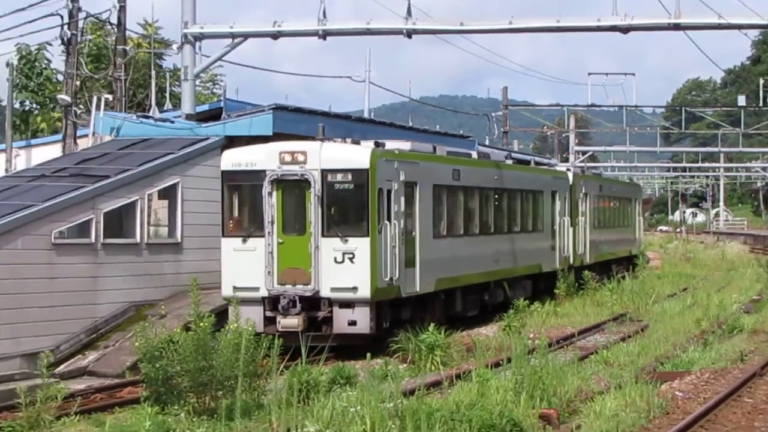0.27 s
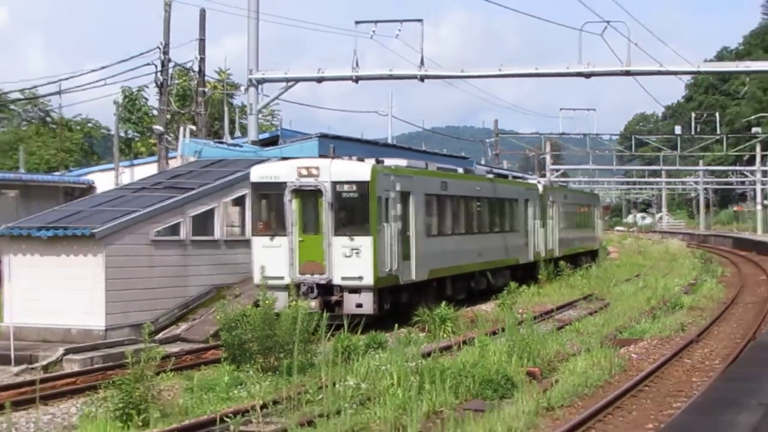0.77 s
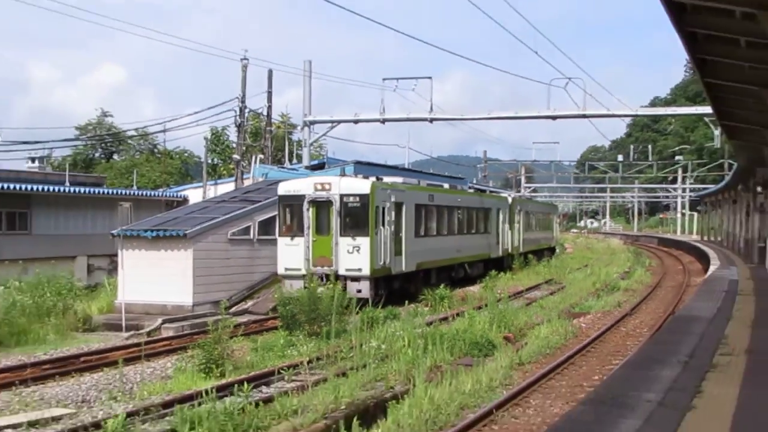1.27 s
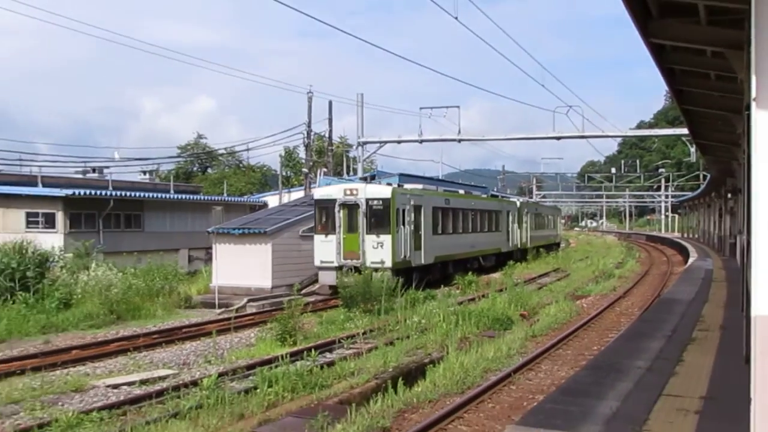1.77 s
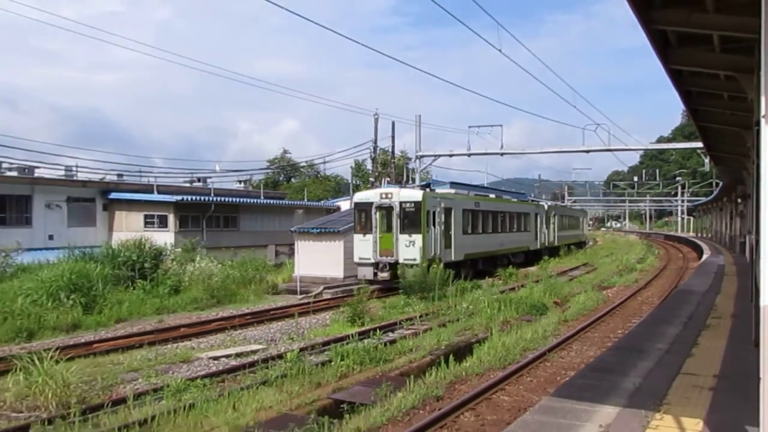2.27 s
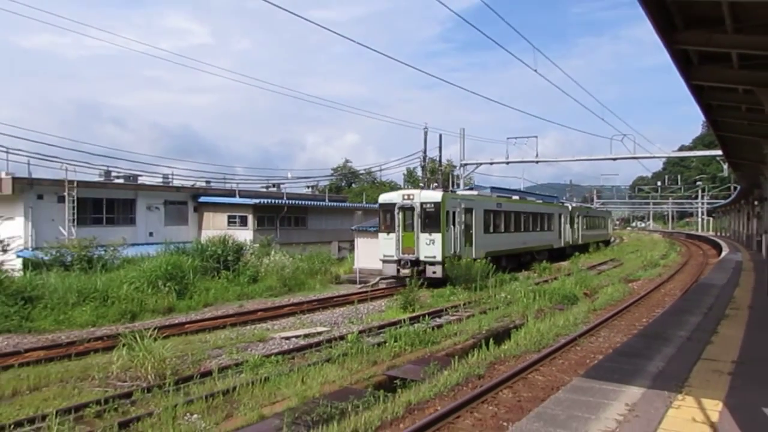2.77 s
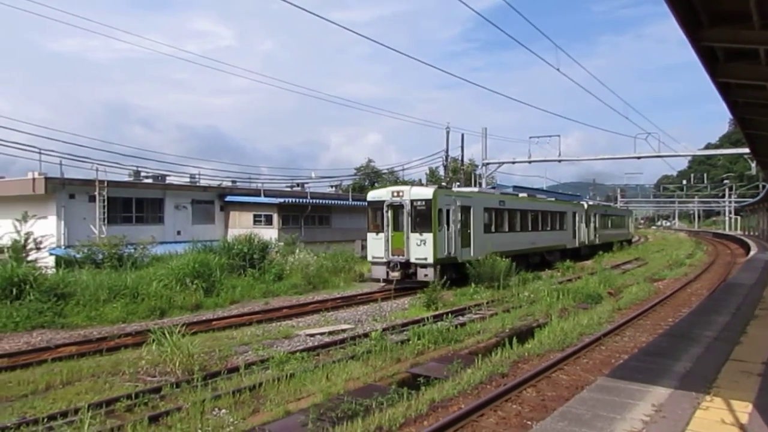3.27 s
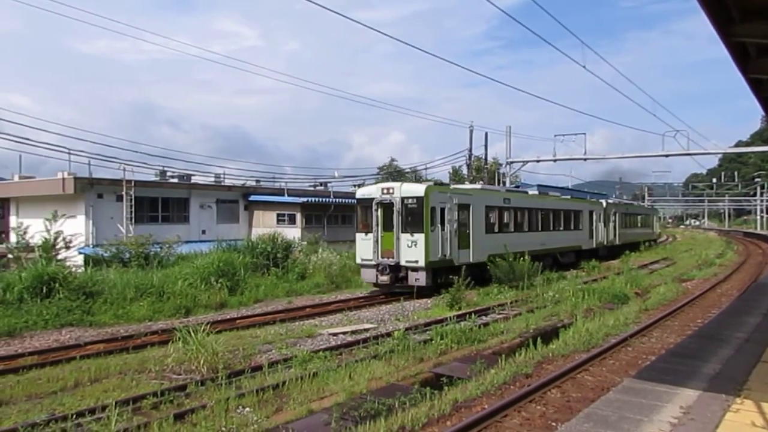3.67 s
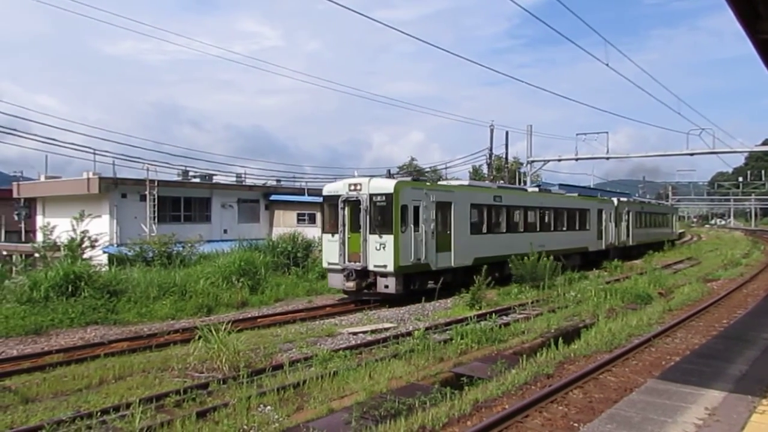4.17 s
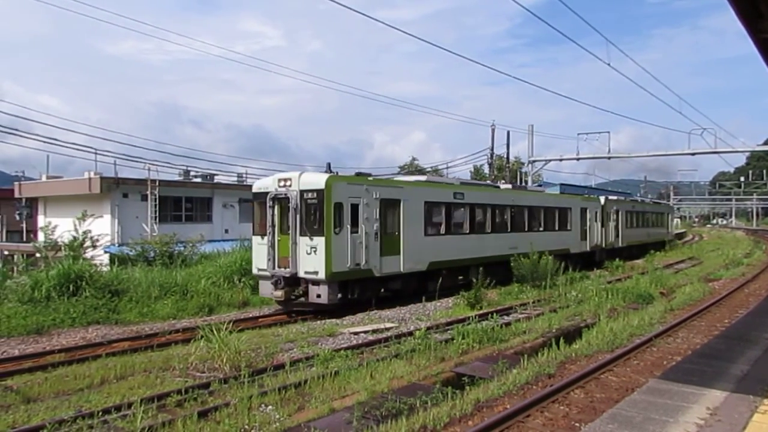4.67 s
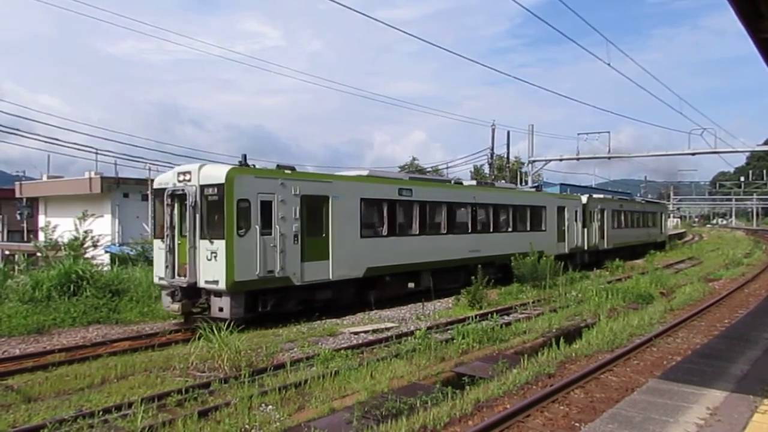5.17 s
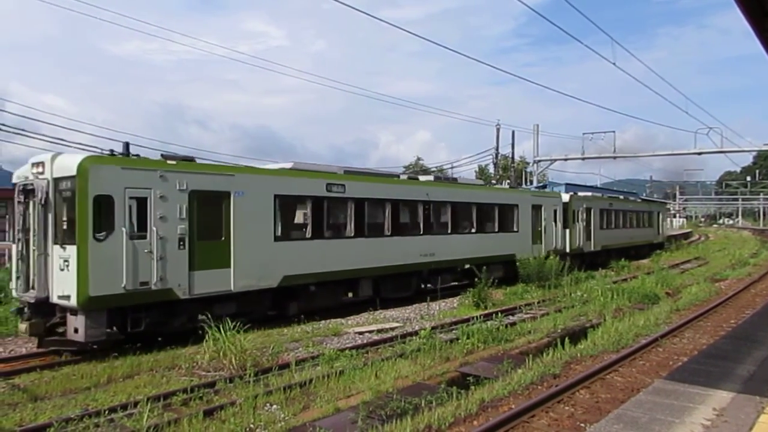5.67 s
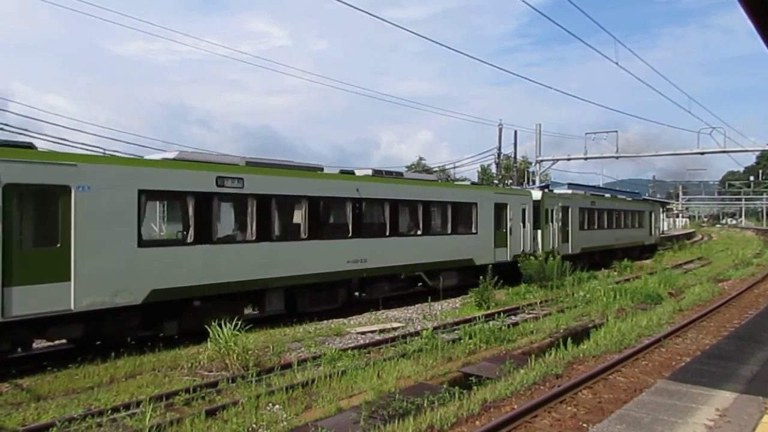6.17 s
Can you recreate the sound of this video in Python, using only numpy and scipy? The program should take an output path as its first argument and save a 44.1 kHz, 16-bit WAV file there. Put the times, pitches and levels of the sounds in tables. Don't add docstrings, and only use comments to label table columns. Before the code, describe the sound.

A diesel railcar pulls along a curved track in open air. At first its deep droning exhaust wavers under buffeting wind, with a soft treble hiss and a faint high squeal. Wheels knock over gaps and a joint with a brief twang and echoes. As it draws level, rolling noise swells, steel scrapes in rough spells, short ringing chirps appear, and a very thin top squeal persists while the drone recedes underneath.

```python
import sys
import numpy as np
from scipy import signal
from scipy.fft import rfft, irfft
from scipy.io import wavfile
from scipy.ndimage import uniform_filter1d, map_coordinates

SR = 44100
rng = np.random.default_rng(int(sys.argv[2]) if len(sys.argv) > 2 else 0)


def output_pcm(signal):
    pcm = np.clip(np.atleast_2d(signal).T, -1, 1) * 32767
    wavfile.write(sys.argv[1], SR, np.round(pcm).astype(np.int16))


def decibels_to_gain(level_db):
    exponent = np.asarray(level_db, float) / 20
    return 10 ** exponent


N = 283563
TIME = np.arange(N) / SR

# t/s, distance/m
DISTANCE = [(0, 31.5), (1.3, 26.1), (1.9, 24), (2.35, 18.3), (3.1, 17.9), (3.84, 12.7), (4.3, 11.15),
            (5.1, 9.14), (6.43, 6.75)]
REFERENCE_M = 8
# t/s, load/dB
LOAD = [(0, 6.5), (.14, 4), (.3, -3), (.96, 2), (1.3, -3.5), (1.92, 5), (2.56, 6), (2.9, 6.5), (3.2, 9),
        (3.52, 5.5), (4.16, 8.5), (4.48, 7), (4.8, 2), (5.12, 4.5), (5.76, 0), (6.43, -0.5)]

# t/s, f/Hz, second harmonic level/dB
FIRING = [(0, 61.1, -35), (.3, 61.3, -35), (.42, 61.7, -29), (.58, 61.8, -40), (.78, 62, -33.5),
          (.97, 62.3, -27), (1.22, 62.86, -35), (1.65, 63.3, -27), (1.83, 63.6, -32.5), (2.02, 65.25, -22),
          (2.26, 67.15, -32), (2.7, 69.03, -21), (3.4, 69.9, -28), (3.75, 70.3, -25), (4.0, 71.6, -34),
          (4.5, 75.8, -36), (5.2, 79.3, -33.5), (6.43, 80.6, -34.5)]
# t/s, slip/turns, in-step level/dB, weaker share/0-1
BEAT = [(0, .1, -17, 0.1), (.22, 0.43, -17.5, 0.36), (.78, 1.48, -18.5, 0.3), (1.36, 2.54, -15, 0.46),
        (1.95, 3.53, -16, 0.8), (2.25, 3.77, -12.5, 1), (2.68, 3.85, -11, 0), (3.25, 4.23, -18, 0.01),
        (3.55, 4.5, -18.5, 0.57), (4.07, 4.95, -13.5, 0.3), (4.6, 5.03, -15, 0.61), (4.88, 5.4, -14, 0.2),
        (5.09, 5.5, -17.5, 0.45), (5.34, 6.0, -17, 0.7), (5.58, 6.46, -20, 0.16), (5.8, 7.3, -21.5, 0.09),
        (6.03, 6.9, -21, 0.3), (6.43, 9.1, -22, 0.6)]
# multiple of the firing rate/1, level at no load/dB, lead/rad
UPPER_ORDERS = [(3, -42, -2.5), (4, -53, -1.5), (5, -46, -1.6), (6, -45, -.3)]

# f/Hz, level/dB per Hz
ROAR_COLOUR = [(30, -13), (45, -23), (60, -12.5), (100, -7), (170, -11.5), (330, -15.5), (560, -19),
               (900, -24.5), (1500, -31.5), (1900, -37), (2300, -44), (2500, -71), (3000, -92)]
# f/Hz, width/Hz, level/dB
UNDERFRAME_MODES = [(428, 71, 6), (712, 17, 8), (1084, 50, 3), (241, 7.5, -12), (632, 17, 5),
                    (410, 16, -0.5), (550, 79, -1.5), (1462, 68, 3.5)]
# level at 8 m/dB, per nearness/dB/dB, per load/dB/dB, at flange bite/dB
ROAR_PARTS = [(-26.5, 0.6947, 0.79, 0), (-30, 0.81, 0.76, -1.5), (-31.5, 0.8855, 0.5461, 1.5),
              (-39.5, 1.23, 0.59, 0.5)]
# f/Hz, unrelated share level/dB
FAR_SIDE = [(60, -51), (110, -76), (200, -40), (380, -24), (700, -15), (1290, -19), (2380, -25),
            (4400, -19), (8120, -8.5), (15000, -4.5)]

# f at the start/Hz, level under the body/dB
AUX_LINES = [(410, -13), (604, -15), (671, -11), (744, -15)]
AUX_CREEP_PER_S, AUX_ENDS_S = 0.0095, 5.4
# start t/s, end t/s, f/Hz, width/Hz, level/dB
HUMS = [(0, 0.16, 412, 30, -35), (3.63, 3.73, 240, 30, -30), (4.15, 4.45, 700, 30, -30),
        (4.5, 4.7, 428, 19, -28.5), (3.5, 4.7, 231, 14.2, -32.5), (5.1, 5.3, 248, 16, -30),
        (5.57, 6.2, 878, 14, -38), (5.535, 5.56, 1122, 8, -25), (5.58, 6.25, 1135, 20, -35.5),
        (5.8, 6.05, 5200, 60, -46), (5.9, 6.45, 2610, 24, -44), (5.3, 5.43, 130, 14, -29),
        (3.85, 4.0, 300, 60, -31), (3.9, 4.1, 1090, 60, -35), (3.15, 3.2, 520, 40, -28),
        (.44, .46, 685, 25, -33), (.83, .9, 675, 18, -38), (1.02, 1.1, 680, 20, -39)]

# f/Hz, level/dB per Hz
HISS_COLOUR = [(1500, -22), (2300, -2.5), (2550, -4.5), (3200, -4), (3500, -3), (4400, 0), (5600, 1),
               (6700, 3.5), (8000, 1), (11000, -4), (14000, -12), (15300, -15), (16000, -25)]
# f/Hz, width/Hz, level/dB
HISS_MODES = [(6680, 110, 5), (2950, 110, -6), (5190, 40, 6), (4960, 120, 3), (3160, 130, 3),
              (4570, 150, 3), (9740, 90, 4), (12300, 200, 3), (13500, 160, 4), (13950, 100, 3),
              (7900, 500, -2)]
# level at 8 m/dB, per nearness/dB/dB, per load/dB/dB, at flange bite/dB
HISS_PARTS = [(-42, 1.57, 0.17, 4), (-48, 2.11, 0.11, 5.4), (-42, 1.79, 0.2, 3.9), (-44.5, 2.05, 0.57, 2.7)]

# t/s, level/dB, f/Hz
THUMPS = [(0.01, -15, 135), (0.036, -25, 149), (0.088, -20, 158), (0.112, -15, 159), (0.134, -6.5, 174),
          (0.2011, -5.5, 215), (0.229, -16.5, 163), (0.321, -33, 134), (0.368, -16, 162), (0.432, -24, 171),
          (0.83, -28, 114.2), (0.889, -8, 152), (0.94, -21, 200), (0.954, -7, 200), (1, -6.5, 190),
          (1.032, -19, 160), (1.085, -12.5, 182), (1.346, -22, 140), (2.14, -19.5, 150), (2.165, -22, 170),
          (2.189, -29, 134), (4.922, -19, 139), (5.031, -27, 166), (5.079, -19, 174), (5.106, -18, 180),
          (5.161, -27, 203), (5.383, -18.5, 199), (5.769, -29, 200), (5.822, -24, 204), (5.859, -28, 210.8)]
# t/s, opposed level/dB, shared level/dB, f/Hz, bright share level/dB
BUFFETS = [
    (.1245, -37, -5, 100, -25),
    (2.16, -30, -22, 64, -25),
]
# middle t/s, length/s, level change/dB
PUFFS = [
    (0, 0.23, -20),
    (1.2, 0.24, 3),
    (1.677, 0.44, -25),
    (2.143, 0.31, 11),
    (3.248, 0.35, 0),
    (4.145, 0.66, -24),
    (4.72, 0.11, -24),
    (6.147, 0.43, 6.5),
]
BREEZE_DB = -41.5
SHARED_DB, SHARED_FOLLOWS = -10, 0.68
BRIGHT_DB, BRIGHT_DB_PER_HZ = -12, 0.4
PUSH_SHARE, PUSH_CYCLES, PUSH_DB = 0.42, 0.52, 6.5

# f/Hz, width/Hz, steady share/0-1, level/dB
FAR_SQUEAL = [(1.05, -82), (1.06, -65), (1.284, -44), (1.63, -48), (1.766, -39), (2.036, -39.5),
              (2.332, -49), (2.508, -41), (2.7, -47.5), (2.85, -62)]
FAR_MODES = [(8550, 60, .2, -4), (8520, 190, 0, -3)]
MID_SQUEAL = [(2.85, -63), (2.95, -55), (3.188, -47.5), (3.75, -54.5)]
MID_MODES = [(10430, 260, 0, 0)]
TOP_SQUEAL = [(4.04, -43), (4.5, -49), (4.66, -29.5), (5.51, -22.5), (5.56, -19.5), (5.86, -21),
              (6.12, -19), (6.39, -22.5), (6.43, -19)]
TOP_MODES = [(13945, 40, .4, -6), (14050, 70, .3, -3.5), (14000, 220, 0, -6), (13750, 380, 0, -11),
             (14200, 700, 0, -17)]

# t/s, peak level/dB, f/Hz
KNOCKS = [
    (1.657, -22, 713),
    (2.688, -19, 1150),
    (2.706, -15, 750),
    (2.723, -20, 1000),
    (3.156, -16, 667),
    (3.162, -20, 1150),
    (3.167, -19, 456),
    (3.188, -18, 520),
    (3.268, -18, 1250),
]
KNOCK_CYCLES, TICK_DB = 2.2, -45
# start t/s, end t/s, width/Hz, steady share/0-1,
# level/dB
CHIRPS = [(3.78, 4.0, 30, .5, -50.5), (4.18, 4.47, 20, .75, -30), (4.25, 4.55, 30, 0.65, -31),
          (4.51, 4.64, 330, 0.1, -28.5), (4.64, 4.81, 40, 0.3, -33), (4.64, 4.97, 90, 0.3, -34),
          (4.83, 4.88, 110, 0.2, -27), (5.04, 5.12, 150, 0.2, -29), (5.22, 5.58, 110, 0.3, -34.5),
          (5.2, 5.5, 110, 0.3, -30), (4.9, 4.97, 60, 0.3, -35), (5.32, 5.62, 13, 0.95, -24),
          (6.08, 6.43, 14.7, 0.7, -37), (5.245, 5.45, 9, 0.95, -30.5), (6.1, 6.2, 30, 0.6, -34),
          (6.38, 6.5, 24, .8, -29), (4.89, 4.98, 110, .4, -23.5), (5.62, 5.82, 180, .1, -30),
          (4.77, 5.0, 80, .3, -37), (5.12, 5.15, 900, 0, -26), (5.19, 5.21, 200, .2, -26),
          (5.2, 5.4, 120, .2, -37), (5.85, 6.43, 80, .3, -38), (5.7, 5.74, 30, .6, -37),
          (2.4, 3.0, 300, .3, -66), (4.97, 5.2, 90, .3, -34), (5.5, 5.85, 90, .3, -38),
          (3.5, 4.0, 60, .4, -57)]
CHIRP_HZ = [10850, 11167, 9593, 10400, 10800, 8563, 6920, 6960, 6830, 8540, 10790, 10797, 9475, 1110, 1150,
            1163, 6960, 13620, 7400, 9200, 6850, 7400, 8500, 10800, 13500, 8555, 8530, 6670]
# t/s, peak level/dB
JOINTS = [
    (2.6808, -12),
]
# delay t/s, level/dB
JOINT_ECHOES = [
    (.012, -5),
    (.022, -1),
    (.034, -2),
    (.047, -7),
]

# f/Hz, level/dB per Hz
FLANGE_COLOUR = [(2940, -23), (5000, -12.5), (5640, -16), (6700, -2.5), (8040, -0.5), (8640, 2.5),
                 (10700, 3.5), (11500, -5.5), (12900, -3.5), (14000, -3), (14300, -7), (15100, -8),
                 (15700, -16)]
# f/Hz, width/Hz, level/dB
WHEEL_MODES = [(5100, 90, 4), (7000, 110, -2), (7470, 80, 4.5), (8490, 280, 6), (9500, 120, 8),
               (10550, 120, 7.5), (11130, 62, 10), (12200, 120, 10.5), (13100, 350, -9)]
# middle t/s, length/s, level/dB, low share level/dB
BITES = [(4.054, 0.078, -36, -3), (4.19, 0.043, -32, -12), (4.298, 0.15, -30, -4.5), (4.455, 0.17, -30, -8),
         (4.626, 0.087, -30, -18), (4.795, 0.24, -28, -2), (5.024, 0.099, -29, 1), (5.152, 0.15, -25, -1),
         (5.286, 0.22, -28, 2.5), (5.52, 0.27, -32.5, -5), (5.845, 0.12, -31, 0), (5.943, 0.087, -26.5, 0),
         (6.118, 0.16, -28.5, -1.5), (6.316, 0.1, -26, -20)]
BITE_S, RUB_DB = 4.017, -42
HIGH_DB, HIGH_FOLLOWS, HIGH_SAG_DB_PER_S = -33.5, 0.44, 2
# f/Hz, unrelated share level/dB
NEAR_SIDE = [(1000, -30), (5000, -25), (6500, -11), (9000, -9), (14000, -5)]

# start t/s, end t/s, low f/Hz, high f/Hz, threshold/spreads
STARVED = [(4.5, 4.64, 15200, 16000, -2), (4.88, 6.5, 15150, 16000, -1.4), (5.4, 6.5, 14850, 15150, .3),
           (4.2, 5.45, 2800, 2960, -.3), (4.25, 5.4, 3000, 3200, .3), (4.2, 5.6, 3350, 3480, 1),
           (4.3, 5.4, 4600, 4750, 1.3), (4.1, 4.7, 2540, 2640, .8), (4.3, 4.8, 5560, 5680, .4),
           (4.2, 6.4, 12850, 13050, .5), (5.9, 6.35, 12600, 12850, 1)]


def curve(table):
    s, *columns = np.transpose(table)
    return [np.interp(TIME, s, c) for c in columns]


def on_log_axis(hz, table):
    f, db = np.transpose(table)
    return np.interp(np.log(hz + 1), np.log(f), db)


def slow(rate_hz, count):
    k = max(int(count / (N / SR) / rate_hz), 1)
    x = uniform_filter1d(uniform_filter1d(rng.standard_normal(count), k), k)
    return x / x.std()


def band(x, low_hz, high_hz):
    return signal.sosfilt(signal.butter(2, [low_hz, high_hz], "band", fs=SR, output="sos"), x)


def gate(start, end, rise):
    return np.clip(np.minimum(TIME - start, end - TIME) / rise, 0, 1)


def bump(t, middle, length):
    return np.exp(-np.abs(2 * (t - middle) / length) ** 3)


def textured(colour, modes, regions_hz, table, size, swell_db, patchy_db, rate_hz):
    hz, s, z = signal.stft(rng.standard_normal((2, N)), SR, nperseg=size)
    db = on_log_axis(hz, colour)
    db = db + sum(g / (1 + (2 * (hz - f) / w) ** 2) for f, w, g in modes)
    t, level, *shares = np.transpose(table)
    wanted = np.array([np.interp(s, t, level + c) for c in [0] + shares])
    have = []
    for low, high in regions_hz:
        power = np.sum(decibels_to_gain(2 * db[(hz >= low) & (hz < high)])) / len(hz)
        have.append(10 * np.log10(power))
    order = np.argsort([low for low, _ in regions_hz])
    moves = (wanted - np.array(have)[:, None])[order]
    centre = np.log([np.sqrt(low * high) for low, high in regions_hz])[order]
    place = np.interp(np.log(hz + 1), centre, np.arange(len(order)))
    grid = np.meshgrid(place, np.arange(len(s)), indexing="ij")
    db = db[:, None] + map_coordinates(moves, grid, order=1)
    patches = np.array([slow(rate_hz, len(s)) for _ in range(30)])
    rows = (29 * np.log(hz / 40 + 1) / np.log(hz[-1] / 40 + 1)).astype(int)
    db = db + swell_db * slow(rate_hz, len(s)) + patchy_db * patches[rows]
    return signal.istft(z * decibels_to_gain(db), SR, nperseg=size)[1][:, :N]


def ring(hz, width_hz, steady):
    steady = np.clip(steady, 0, 1)
    drift_hz = 0.15 * steady * width_hz * slow(12, N)
    phase = 2 * np.pi * np.cumsum(hz + drift_hz) / SR
    lowpass = signal.butter(2, width_hz / 2, fs=SR, output="sos")
    wobble = signal.sosfilt(lowpass, rng.standard_normal((4, N)))
    wobble = wobble / wobble.std()
    locked = np.sqrt(2 * steady) * np.cos(phase + np.array([[0], [1.5]]))
    loose = wobble[:2] * np.cos(phase) + wobble[2:] * np.sin(phase)
    return locked + np.sqrt(1 - steady) * loose


def parts(rules):
    near_db = -20 * np.log10(curve(DISTANCE)[0] / REFERENCE_M)
    load_db = curve(LOAD)[0]
    db = [a + b * near_db + c * load_db + d * gate(BITE_S, 9, 0.02) for a, b, c, d in rules]
    return np.transpose([TIME, db[0]] + [v - db[0] for v in db[1:]])[::256]


def beating(order):
    slip, _, share = curve(BEAT)
    share = np.clip(share, 0, 0.95)
    return 20 * np.log10(np.abs(1 + share * np.exp(2j * np.pi * order * slip)) / (1 + share))


def exhausts():
    first_db = curve(BEAT)[1] + beating(order=1)
    firing_hz, second_db = curve(FIRING)
    load_db = curve(LOAD)[0]
    phase = 2 * np.pi * np.cumsum(firing_hz * (1 + 0.0055 * slow(15, N))) / SR
    tone = decibels_to_gain(first_db + 0.6 * slow(22, N)) * np.sin(phase)
    second_phase = 2 * phase - 1.75 + 0.5 * slow(2, N)
    tone = tone + decibels_to_gain(second_db - 1 + 0.91 * slow(23, N)) * np.sin(second_phase)
    for order, db, lead in UPPER_ORDERS:
        level = decibels_to_gain(db + 0.6 * load_db + 4 * slow(5, N))
        tone = tone + level * np.sin(order * phase + lead + 0.7 * slow(4, N))
    return np.sqrt(2) * tone, phase


def roar(phase):
    regions = [(330, 900), (170, 300), (950, 1500), (1600, 2250)]
    noise = textured(ROAR_COLOUR, UNDERFRAME_MODES, regions, parts(ROAR_PARTS),
                     size=2048, swell_db=-0.35, patchy_db=1.0, rate_hz=6.4)
    return decibels_to_gain(-0.78) * noise * (1 + 0.044 * np.cos(phase - 1.3))


def auxiliary():
    s, body_db = parts(ROAR_PARTS).T[:2]
    lines = 0
    for f, db in AUX_LINES:
        lines = lines + decibels_to_gain(db + 2.5 * slow(6, N)) * ring(f * (1 + AUX_CREEP_PER_S * TIME), 16, 0.6)
    return decibels_to_gain(np.interp(TIME, s, body_db)) * lines * gate(-1, AUX_ENDS_S, 0.8)


def hums():
    return sum(decibels_to_gain(db) * gate(a - 0.03, b, 0.025) * ring(f, w, 0.75) for a, b, f, w, db in HUMS)


def hiss():
    regions = [(3300, 5500), (2450, 3100), (6000, 8000), (11000, 15500)]
    return textured(HISS_COLOUR, HISS_MODES, regions, parts(HISS_PARTS),
                    size=1024, swell_db=0.4, patchy_db=1.1, rate_hz=9)


def wind():
    breeze_db = BREEZE_DB + sum(db * bump(TIME, s, length) for s, length, db in PUFFS)
    gust = decibels_to_gain(breeze_db + 19.0 + 6.8 * slow(25, N))
    out = np.zeros((2, N))
    span = np.arange(-2048, 2048)
    t = span / SR
    eddies = list(BUFFETS)
    for s, db, hz in THUMPS:
        bright_db = min(BRIGHT_DB + BRIGHT_DB_PER_HZ * (hz - 150), -1)
        eddies.append((s, db, SHARED_DB + SHARED_FOLLOWS * db, hz, bright_db))
    for s, opposed_db, shared_db, hz, bright_db in eddies:
        turn = 2 * np.pi * rng.random((2, 1))
        turn[1] = np.pi + (turn[1] - np.pi) / 6
        at = np.clip(int(s * SR) + span, 0, N - 1)
        low = np.exp(-(t * hz / 1.5) ** 2) * np.cos(2 * np.pi * hz * t + turn)
        core = np.exp(-(t / 0.0032) ** 2) * np.cos(2 * np.pi * 320 * t + turn)
        bright = core * decibels_to_gain(bright_db + np.array([[3], [2]]))
        opposed, shared = decibels_to_gain(np.array([[opposed_db - 2.5], [shared_db + 1.5]])) * (low + bright)
        push_hz = hz * PUSH_SHARE
        dip = np.exp(-(t * push_hz / PUSH_CYCLES) ** 2) * np.cos(2 * np.pi * push_hz * t)
        shared = shared - decibels_to_gain(shared_db + PUSH_DB) * dip * (opposed_db > shared_db - 9)
        out[:, at] += [shared + opposed, shared - opposed]
        gust[at] += decibels_to_gain(opposed_db + 8) * np.exp(-((t - 0.006) / 0.018) ** 2)
    return out + gust * band(band(rng.standard_normal((2, N)), 70, 260), 70, 260)


def squeal(table, modes):
    tone = 0
    for f, w, steady, db in modes:
        flutter_db = 1.0 * slow(6.4, N) + 0.86 * slow(25, N)
        tone = tone + decibels_to_gain(db + flutter_db) * ring(f, w, steady)
    return tone * decibels_to_gain(curve(table)[0]) * gate(table[0][0], table[-1][0] + 0.048, 0.01)


def knocks():
    out = np.zeros(N)
    t = np.arange(1024) / SR
    for s, db, hz in KNOCKS:
        envelope = t * hz * np.exp(-(t * hz / KNOCK_CYCLES) ** 2)
        out[int(s * SR):][:len(t)] += decibels_to_gain(db + 2.0) * np.sin(2 * np.pi * hz * t) * envelope
    tick = bump(TIME, JOINTS[0][0] + 0.003, 0.012) * band(rng.standard_normal(N), 7000, 15500)
    return out + decibels_to_gain(TICK_DB) * tick


def chirps():
    out = 0
    for f, (a, b, w, steady, db) in zip(CHIRP_HZ, CHIRPS):
        flutter_db = (1.2 - steady) * (2.5 * slow(11, N) + 2 * slow(40, N))
        out = out + decibels_to_gain(db + flutter_db) * gate(a - 0.02, b + 0.03, 0.04) * ring(f, w, steady)
    return out


def joints():
    t = np.arange(int(SR / 20)) / SR
    falling = np.sin(2 * np.pi * 2150 * 0.0036 * np.log(1 + t / 0.0036))
    attack = np.sin(np.minimum(t / 0.003, 1) * np.pi / 2) ** 2
    twang = falling * np.exp(-(t / 0.018) ** 2) * attack
    blows, echoes = np.zeros((2, N))
    for s, db in JOINTS:
        blows[int(s * SR)] = decibels_to_gain(db)
        for delay, echo_db in JOINT_ECHOES:
            echoes[int((s + delay) * SR)] = decibels_to_gain(db + echo_db)
    return signal.fftconvolve(blows + decibels_to_gain(2.5) * band(echoes, 220, 460), twang)[:N]


def grinding():
    t = TIME[::256]
    power = np.array([decibels_to_gain(2 * db) * bump(t, s, length) for s, length, db, _ in BITES])
    total = power.sum(axis=0) + decibels_to_gain(2 * RUB_DB)
    level = 10 * np.log10(total)
    low_power = decibels_to_gain(2 * np.array(BITES)[:, 3]) @ power + decibels_to_gain(2 * RUB_DB - 15)
    low = 10 * np.log10(low_power / total)
    high = HIGH_DB + HIGH_FOLLOWS * (level + 29.0) - HIGH_SAG_DB_PER_S * (t - BITE_S) - level
    return np.transpose([t, level, low, high])


def flange():
    regions = [(7900, 10200), (6000, 7700), (11400, 13000)]
    noise = textured(FLANGE_COLOUR, WHEEL_MODES, regions, grinding(),
                     size=768, swell_db=0.95, patchy_db=1.0, rate_hz=22)
    return decibels_to_gain(-0.8) * noise * gate(BITE_S, 9, 0.0021)


def ports(near, diffuse, lead_us, side):
    hz = np.fft.rfftfreq(N, 1 / SR)
    turn = np.exp(1j * np.pi * hz * lead_us / 1e6)
    direct = rfft(near)
    difference = rfft(diffuse) * decibels_to_gain(on_log_axis(hz, side))
    return irfft(np.array([direct * turn + difference, direct / turn - difference]), N)


def scene():
    tone, phase = exhausts()
    far = roar(phase) + auxiliary() + hums() + hiss()
    far = far + squeal(FAR_SQUEAL, FAR_MODES) + squeal(MID_SQUEAL, MID_MODES) + knocks() + joints()
    near = squeal(TOP_SQUEAL, TOP_MODES) + chirps() + flange()
    passing = ports(*near, 15, NEAR_SIDE) * decibels_to_gain(np.array([[-0.4], [0.4]]))
    return tone + ports(*far, -8.0, FAR_SIDE) + passing + wind()


def starve(x):
    hz, s, z = signal.stft(x, SR, nperseg=1024)
    keep = np.ones(z.shape[1:])
    for start, end, low_hz, high_hz, threshold in STARVED:
        lost = (s > start) & (s < end) & (slow(25, len(s)) > threshold)
        keep[(hz > low_hz) & (hz < high_hz)] *= 1 - 0.97 * lost
    return signal.istft(z * keep, SR, nperseg=1024)[1][:, :N]


def band_limit(x):
    return signal.sosfilt(signal.butter(12, 15730, fs=SR, output="sos"), x)


def record(dry):
    x = signal.sosfilt(signal.butter(3, 40, "high", fs=SR, output="sos"), dry)
    rounded = np.tanh(0.8 * x) / 0.8
    return band_limit(starve(rounded))


dry = scene()
out = record(dry)
output_pcm(out)
```